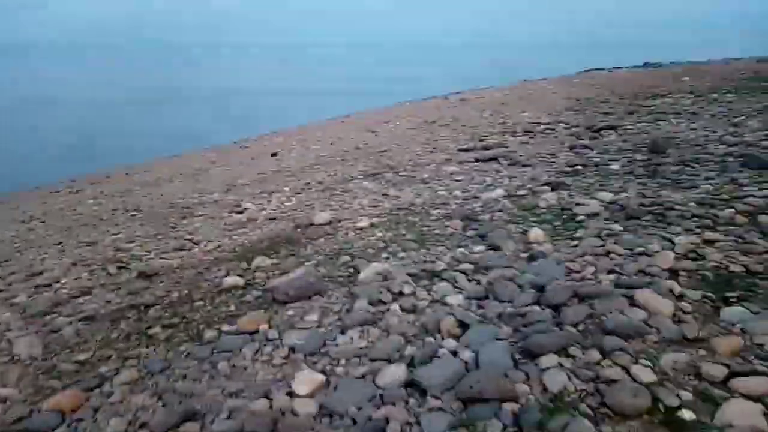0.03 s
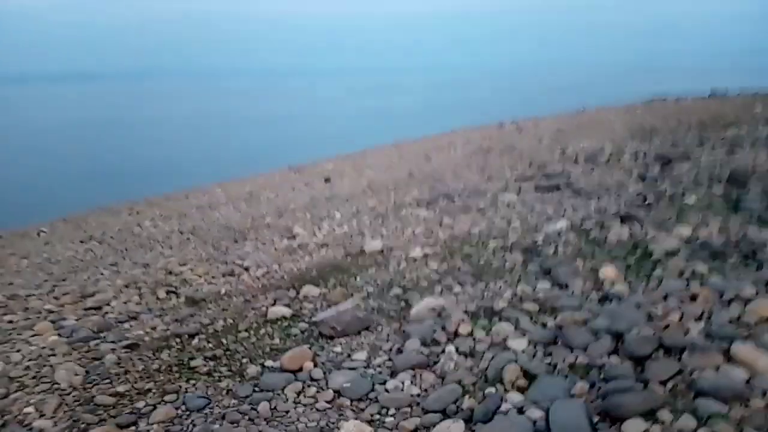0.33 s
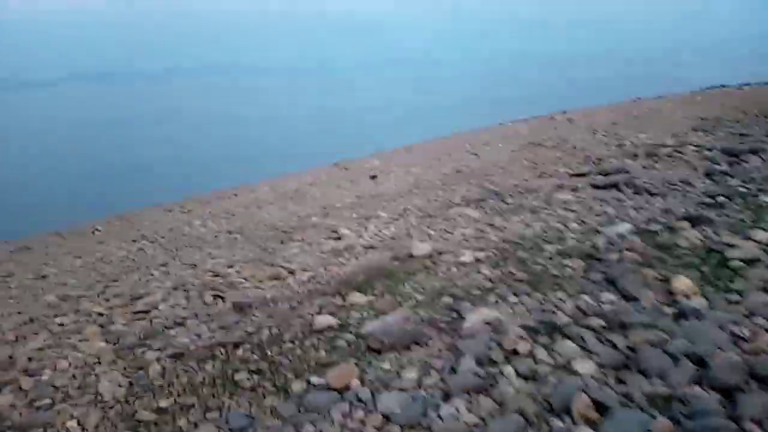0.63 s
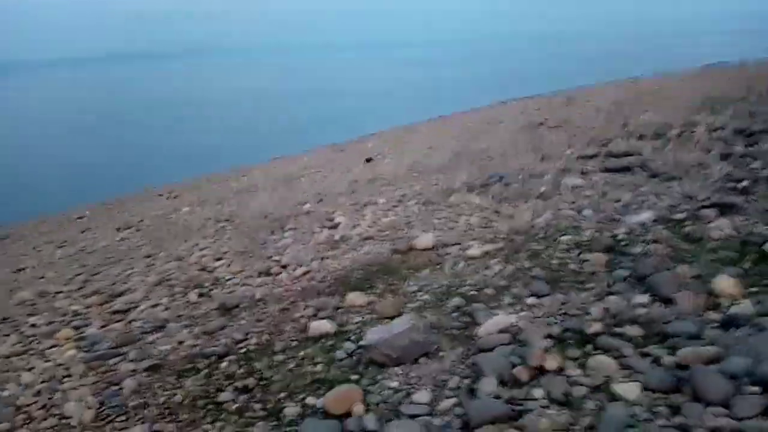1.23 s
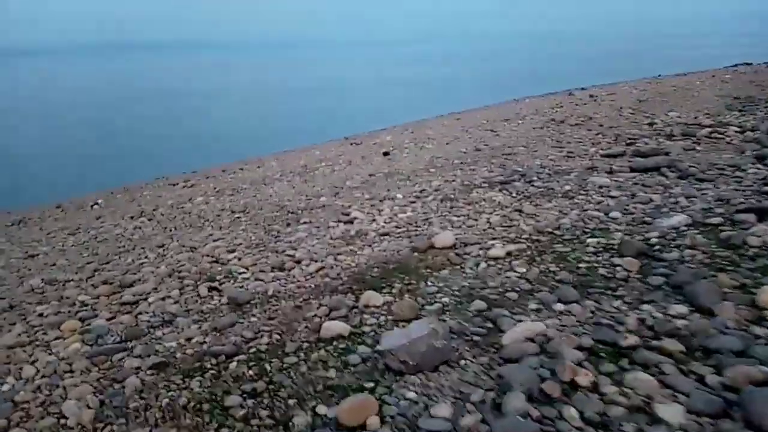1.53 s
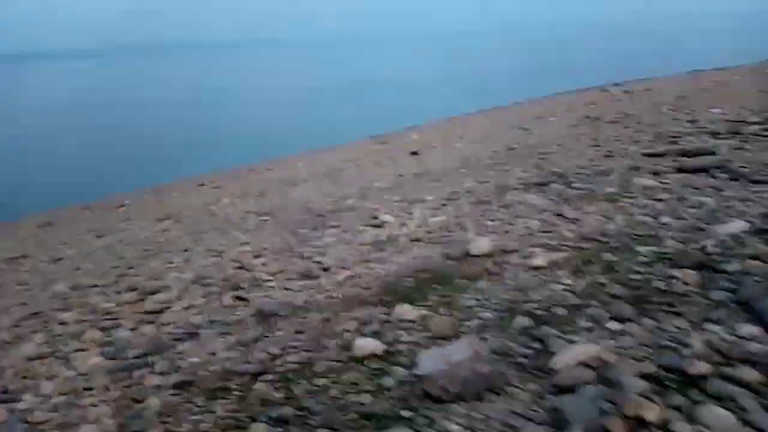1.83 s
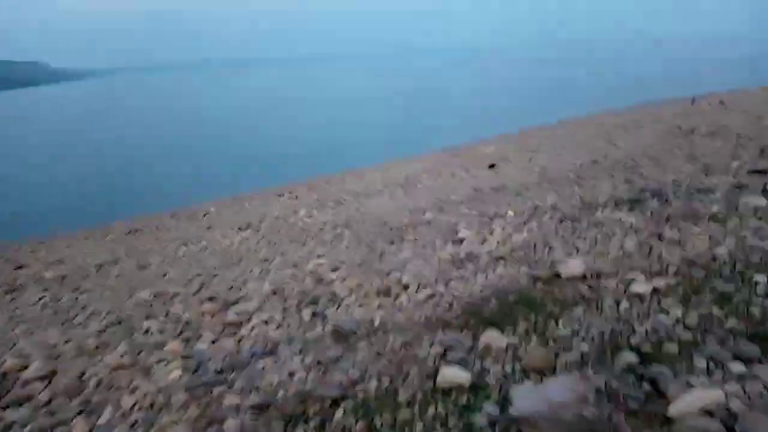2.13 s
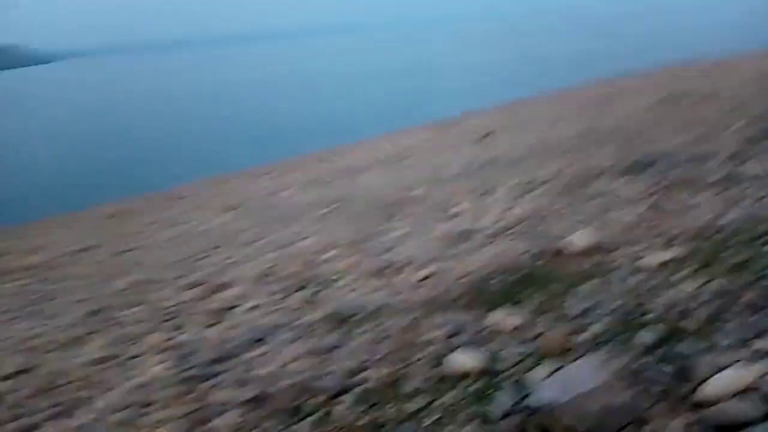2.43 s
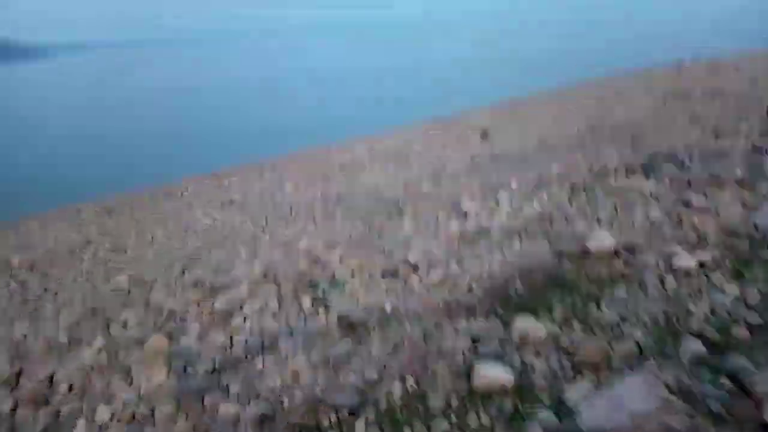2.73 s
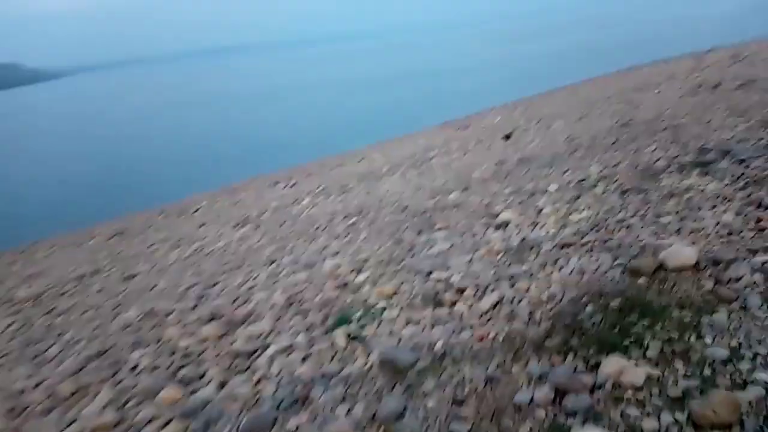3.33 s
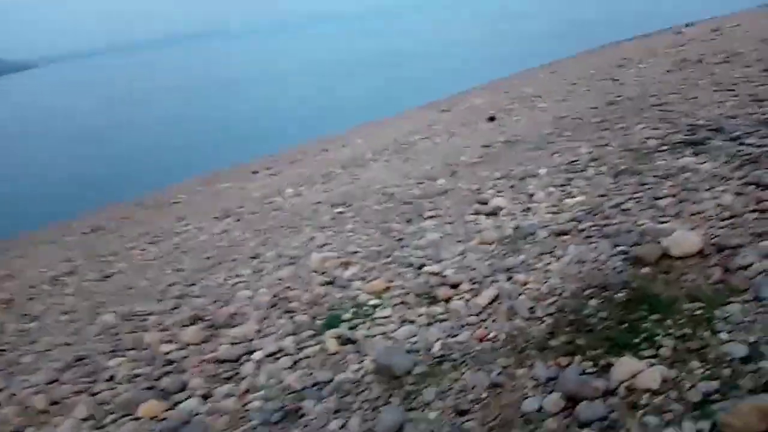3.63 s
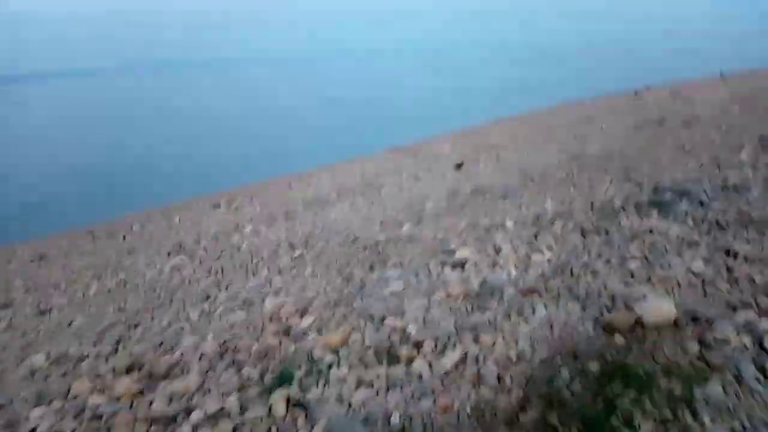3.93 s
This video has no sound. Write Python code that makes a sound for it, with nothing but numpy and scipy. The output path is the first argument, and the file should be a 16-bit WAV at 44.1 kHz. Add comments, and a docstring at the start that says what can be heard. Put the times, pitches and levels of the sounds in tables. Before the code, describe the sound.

Shoes crunching over a pebble lake shore, light wind and a small bird faintly behind.

```python
"""A pebble beach by a lake, the microphone near slow footsteps, water lapping faintly behind.
From the start, each push of a shoe sets off a crunch of small stones and grit; larger pebbles clack
together and now and then a heel thumps the bed. At about 0.9 s and again at 2.4 s a small bird
calls, three faint chirps each time. Light wind rumbles on the microphone throughout and,
in the last gust from 3.5 s, briefly hoots at its edge."""
import sys
import numpy as np
from scipy import signal
from scipy.fft import rfft, irfft, next_fast_len
from scipy.io import wavfile
from scipy.ndimage import uniform_filter1d, map_coordinates

SR = 44100
rng = np.random.default_rng(int(sys.argv[2]) if len(sys.argv) > 2 else 0)


def store_wav(level_fs):
    """Save 16-bit WAV to argv[1]."""
    pcm = np.round(np.clip(np.atleast_2d(level_fs), -1, 1) * 32767)
    wavfile.write(sys.argv[1], SR, pcm.T.astype(np.int16))


N = 176400

# Water at the shoreline: time_s, level_db
WATER_LEVEL = [(0, -64.5), (.5, -62.5), (.8, -66), (1.2, -64), (1.9, -63), (2.55, -59.5), (3.15, -65),
               (3.52, -63), (3.63, -76.5), (3.8, -62.5), (4, -54)]
# Colour of the water: frequency_hz, gain_db
WATER_COLOUR = [(100, 6.5), (300, -21.5), (700, -9.5), (1300, -7.5), (2000, -4), (3000, -19.5),
                (4300, -4.5), (5500, -16.5), (7000, -22), (8500, -30.5), (13000, -31), (15500, -24)]
# Gusts on the microphone: time_s, relative_level_db
GUSTS = [(0, -64.5), (.05, -57), (.33, -62.5), (.48, -67.5), (.7, -63.5), (.85, -65.5), (1.35, -67.5),
         (1.58, -54), (2.1, -70), (2.17, -52), (2.22, -60), (2.62, -59), (2.77, -51), (2.92, -57),
         (3.03, -54.5), (3.07, -39), (3.12, -51), (3.42, -48.5), (3.5, -55), (3.7, -47.5), (3.83, -47.5),
         (4, -44.5)]
# Colour of their rumble: frequency_hz, gain_db
RUMBLE_COLOUR = [(20, -18), (35, -31), (58, -0.5), (90, 0.5), (130, -3), (200, -11), (300, -23), (500, -42),
                 (1500, -63.5)]
# Eddy tone at the microphone's edge: time_s, pitch_hz, level_db
EDDY_TONE = [(3.51, 135, -62), (3.549, 137.8, -37.5), (3.6, 124.1, -41.5), (3.637, 120.6, -34),
             (3.68, 129.8, -42), (3.71, 133.6, -35.5), (3.749, 147, -41), (3.785, 147.8, -62),
             (3.814, 151, -39), (3.85, 153, -58)]
# The bird's chirps: start_s, level_db, upper_pitch_hz, lower_pitch_hz
BIRD_CHIRPS = [(0.901, -53.5, 7300, 6570), (.98, -55.5, 6900, 6240), (1.068, -55, 7200, 6180),
               (2.426, -50, 7300, 6400), (2.505, -49.5, 6880, 6140), (2.59, -48.5, 6940, 6100)]
# Heels striking the bed: start_s, relative_level_db, pitch_hz
HEEL_THUMPS = [(0.053, -35, 297), (.267, -30.5, 223), (2.249, -46, 330), (2.337, -42, 238),
               (3.3296, -27.5, 298)]
# Larger pebbles knocking together: start_s, relative_level_db, pitch_hz, t60_s
PEBBLE_CLACKS = [(0.169, -46, 1770, 0.0054), (0.206, -36.5, 4500, 0.015), (.305, -28, 2400, .005),
                 (.322, -20.5, 3420, 0.0023), (0.3248, -25.5, 2500, 0.0056), (.584, -38.5, 624, 0.018),
                 (.586, -43.5, 3330, 0.008), (.715, -29, 505, 0.017), (.716, -49, 3130, 0.0029),
                 (.904, -32, 3030, .006), (.91, -33, 2920, .005), (.965, -36, 4430, 0.0045),
                 (.99, -39, 3300, .005), (1.134, -49, 4030, .01), (1.166, -43.5, 3200, 0.0093),
                 (1.39, -26, 6850, 0.0063), (1.477, -24.5, 4400, 0.0051), (1.488, -24, 6980, 0.009),
                 (1.51, -32, 1500, 0.011), (1.6152, -17, 3100, 0.0051), (1.6793, -12, 2380, 0.0072),
                 (1.6852, -15.5, 3250, .006), (1.696, -16.5, 4300, 0.0052), (1.7619, -23, 3870, 0.0017),
                 (1.8003, -35, 1800, 0.01), (1.972, -42, 3600, 0.016), (2.114, -39, 566, 0.034),
                 (2.1153, -23, 4540, 0.005), (2.121, -30, 2320, 0.0055), (2.1958, -29, 2100, 0.0045),
                 (2.198, -46, 630, 0.033), (2.214, -27.5, 610, 0.048), (2.217, -21, 1930, 0.0082),
                 (2.2323, -17.5, 3650, 0.018), (2.25, -28.5, 566, 0.035), (2.2511, -21.5, 2050, .006),
                 (2.2865, -19, 4000, .005), (2.316, -21, 3560, .007), (2.336, -26, 3260, 0.0044),
                 (2.394, -37, 4000, .005), (2.4132, -26.5, 4250, 0.0027), (2.431, -38, 4080, .009),
                 (2.476, -36, 3960, .007), (2.545, -38, 2600, 0.0071), (2.836, -21.5, 1500, 0.0058),
                 (2.8495, -15.5, 2490, 0.0056), (2.8517, -14, 1760, 0.0027), (2.873, -24.5, 3500, 0.0059),
                 (2.898, -25.5, 1210, 0.0035), (2.907, -29, 2420, 0.0052), (2.9369, -27, 2140, .008),
                 (2.959, -36, 2400, .006), (3.08, -44, 2500, .006), (3.143, -37, 3320, 0.0071),
                 (3.232, -39, 4340, 0.006), (3.2993, -23, 3360, 0.0034), (3.33, -12.5, 2280, 0.0024),
                 (3.4467, -24.5, 2950, 0.0035), (3.555, -50, 4170, 0.017), (3.7434, -44.5, 5050, 0.025),
                 (3.781, -51, 4300, 0.022), (3.8022, -43, 3980, 0.018), (3.845, -46, 4460, .02),
                 (3.91, -29, 1767, 0.012), (3.989, -30.5, 2250, 0.0054)]
# Pushes of the shoes: peak_s, rise_s, fall_s, stones_db, bed_re_stones_db, grit_re_stones_db
SHOE_PUSHES = [(0.057, 0.011, 0.11, -52.5, -3.5, -17.5), (.157, 0.0059, .03, -46, -22, -16.5),
               (0.173, 0.033, 0.035, -44.5, -8.5, -18), (0.302, 0.012, 0.061, -46, 1.5, -14.5),
               (0.584, 0.0027, 0.021, -50.5, 3.5, -34), (0.683, 0.0068, .04, -52, -6, -11),
               (0.715, 0.044, 0.044, -46.5, 0, -9.5), (.792, 0.15, 0.037, -49, -9, -14.5),
               (0.853, 0.0038, 0.056, -46.5, -3, -6.5), (0.9, 0.052, 0.022, -41, -4.5, -28),
               (0.974, .06, 0.048, -47.5, -6.5, -22), (1.419, 0.079, 0.05, -47, -5.5, -13.5),
               (1.478, 0.0071, 0.027, -36.5, -19, -9), (1.514, 0.037, 0.043, -41, -4.5, -9),
               (1.452, 0.028, 0.037, -43, -8, -13), (1.583, 0.047, 0.1, -46, -0.5, -11),
               (1.641, .004, 0.016, -41.5, -13, -13.5), (1.687, 0.041, 0.058, -32, -3, -20.5),
               (1.85, 0.019, 0.025, -49, -24, -15), (1.972, 0.027, 0.21, -57, -7.5, -16.5),
               (2.061, 0.012, 0.15, -54.5, 0.5, -5), (2.12, 0.021, 0.049, -41, -2.5, -16),
               (2.241, 0.061, 0.1, -35.5, -5, -16.5), (2.281, 0.021, 0.025, -33, -10, -12.5),
               (2.349, 0.13, 0.3, -50, -6.5, -11), (2.656, 0.0096, 0.19, -45.5, -0.5, -8.5),
               (2.789, .1, 0.051, -44.5, -5.5, -15.5), (2.844, 0.036, .04, -32, -3, -21),
               (2.876, 0.013, 0.076, -35, -5.5, -20), (2.94, 0.033, 0.34, -57.5, -8.5, -24),
               (3.302, 0.016, 0.061, -42, -1.5, -17), (3.334, 0.017, 0.031, -38.5, -10, -17),
               (3.409, 0.12, 0.12, -44.5, -5, -15.5), (3.891, 0.021, 0.13, -42.5, -7, -13.5),
               (3.963, 0.084, 0.34, -40, -6, -18)]
# Colours of the small stones, the hollow bed and the grit: frequency_hz, gain_db
STONE_COLOUR = [(150, -34), (500, -7), (1000, -6), (2200, 2), (3000, -2), (4300, 3.5), (5200, -0.5),
                (5900, -5), (7000, -20.5), (8300, -12), (12000, -43)]
BED_COLOUR = [(60, -26), (160, -3), (280, -2), (420, 1), (600, 0), (850, -5), (1400, -26.5), (4000, -79)]
GRIT_COLOUR = [(2500, -15), (5000, -19), (7000, 17), (8400, -1), (10000, 8.5), (11500, 1.5), (13500, -7.5),
               (15200, 9), (16000, -18)]


def amp(db):
    return 10 ** (np.asarray(db) / 20)


def unit_rms(x):
    return x / np.sqrt(np.mean(x ** 2) + 1e-20)


def add(track, start_s, sound):
    i = max(round(start_s * SR), 0)
    track[i:i + len(sound)] += sound[:len(track) - i]


def curves(rows):
    """One value per sample for each column after the time."""
    times, *columns = np.transpose(rows)
    return [np.interp(np.arange(N) / SR, times, column) for column in columns]


def wobble(per_s):
    """A smooth random curve with per_s knots a second."""
    knots = rng.standard_normal(int(N * per_s / SR) + 4)
    return map_coordinates(knots, [np.arange(N) * per_s / SR])


def coloured(x, colour):
    """x through a causal filter of the given colour, at rms 1."""
    size = 2 * next_fast_len(N // 2 + 4096)
    hz, db = np.transpose(colour)
    gain_db = np.interp(np.log(np.fft.rfftfreq(size, 1 / SR) + 1), np.log(hz), db)
    cepstrum = irfft(np.log(amp(gain_db)))
    cepstrum[1:size // 2] *= 2  # fold to minimum phase
    cepstrum[size // 2 + 1:] = 0
    return unit_rms(irfft(rfft(x, size) * np.exp(rfft(cepstrum)))[:N])


def noise(colour):
    return coloured(rng.standard_normal(N), colour)


def patchy(x, depth_db=3.2, width_hz=330, life_s=.014):
    """x with short random resonances that come and go, at rms 1."""
    spectrum = signal.stft(x, nperseg=512)[2]
    bins, frames = np.indices(spectrum.shape)
    grid = [bins * SR / 512 / width_hz, frames * 256 / SR / life_s]
    knots = rng.standard_normal([int(axis.max()) + 2 for axis in grid])
    gain = amp(depth_db * map_coordinates(knots, grid))
    return unit_rms(signal.istft(spectrum * gain, nperseg=512)[1][:N])


def steadied(x, window_s=.018):
    """x with its slow level evened out."""
    power = np.abs(uniform_filter1d(x ** 2, round(window_s * SR)))
    return x / np.sqrt(power + 1e-9)


def lapping_water():
    """Faint water laps at the stones in the background."""
    level_db, = curves(WATER_LEVEL)
    return amp(level_db + 0.92 * wobble(25)) * patchy(noise(WATER_COLOUR))


def wind_rumble(boost_db=3, buffet_db=3):
    """Gusts buffet the microphone with low noise."""
    level_db, = curves(GUSTS)
    return amp(level_db + boost_db + buffet_db * wobble(14)) * noise(RUMBLE_COLOUR)


def wind_hoot(waver=.02, flutter_db=1.3, octave_db=-22, fade_s=.01):
    """Eddies at the microphone's edge sound a wavering tone in the last gust."""
    hz, db = curves(EDDY_TONE)
    t = np.arange(N) / SR
    phase = 2 * np.pi * np.cumsum(hz * (1 + waver * wobble(90))) / SR
    tone = np.sqrt(2) * (np.sin(phase) + amp(octave_db) * np.sin(2 * phase))
    gate = np.clip(np.minimum(t - EDDY_TONE[0][0], EDDY_TONE[-1][0] - t) / fade_s, 0, 1)
    return gate * amp(db + flutter_db * wobble(100)) * tone


def bird(chirp_s=.042, roughness=.022, rasp_db=2, echo_db=-8, echo_t60_s=0.43):
    """Each chirp is two arched whistles at once, with a short outdoor echo."""
    out, u = np.zeros(N), np.linspace(-1, 1, round(chirp_s * SR))
    for start_s, db, upper_hz, lower_hz in BIRD_CHIRPS:
        for hz, arch, voice_db, swell in ((upper_hz, .14, -6, .5), (lower_hz, .11, 0, 2)):
            pitch_hz = hz * (1 - arch * u ** 2 + roughness * wobble(308)[:len(u)])
            envelope = amp(db + voice_db + rasp_db * wobble(514)[:len(u)]) * (1 - u ** 2) ** swell
            add(out, start_s, envelope * np.sin(2 * np.pi * np.cumsum(pitch_hz) / SR))
    t = np.arange(SR // 3) / SR
    echo = rng.standard_normal(len(t)) * amp(-60 * t / echo_t60_s)
    return out + amp(echo_db) * signal.fftconvolve(out, echo / np.linalg.norm(echo))[:N]


def heel_thumps(t60_s=0.016):
    """A heel pushes the bed once, dully."""
    out, t = np.zeros(N), np.arange(SR // 10) / SR
    for start_s, db, hz in HEEL_THUMPS:
        envelope = 2 * amp(db - 60 * t / t60_s) * (1 - np.exp(-2 * hz * t))
        add(out, start_s, envelope * np.sin(2 * np.pi * hz * t))
    return out


def pebble_ring(t, hz, t60_s, rise_cycles=1.15):
    """One struck pebble rings; the softness of the contact rounds its attack."""
    rise = np.sin(np.pi / 2 * np.minimum(hz * t / rise_cycles, 1)) ** 2
    envelope = rise * amp(-60 * t / t60_s)
    return envelope / envelope.max() * np.sin(2 * np.pi * hz * t)


def pebble_clacks(trim_db=-2.5, second_db=-7, rattle_db=-12, rattle_rise_s=.001, rattle_t60_s=0.011):
    """Two pebbles meet and ring for some milliseconds, then their neighbours rattle."""
    out, t = np.zeros(N), np.arange(SR // 10) / SR
    neighbours = noise(STONE_COLOUR) + noise(BED_COLOUR) / 2
    rattle_envelope = amp(rattle_db - 60 * t / rattle_t60_s) * np.minimum(t / rattle_rise_s, 1)
    pitch_ratios = rng.uniform(0.48, 1.316, len(PEBBLE_CLACKS))
    for (start_s, db, hz, t60_s), ratio in zip(PEBBLE_CLACKS, pitch_ratios):
        pair = pebble_ring(t, hz, t60_s) + amp(second_db) * pebble_ring(t, hz * ratio, t60_s / 2)
        rattle = np.roll(neighbours, -round(start_s * SR))[:len(t)] * rattle_envelope
        add(out, start_s, amp(db + trim_db) * (pair + rattle))
    return out


def stone_contacts(per_s, size_spread_db, max_count, median_hz=2840, t60_cycles=8.8, tick_db=6):
    """Small stones touch at random, each with a tick and a few cycles of ringing."""
    when, size, chance, sign = rng.random((max_count, 4)).T
    hz = np.clip(median_hz * np.exp(0.586 * rng.standard_normal(max_count)), 300, 14000)
    gain = amp(-size_spread_db * np.log(size + .01)) * np.sign(sign - .5)
    sounding = chance < per_s * N / SR / max_count
    hz, gain = hz[sounding, None], gain[sounding, None]
    age = np.arange(SR // 200)
    cycles = hz * age / SR
    rings = np.sqrt(hz / median_hz) * np.sin(2 * np.pi * cycles) * amp(-60 * cycles / t60_cycles)
    rings[:, 0] += amp(tick_db)
    samples = (when[sounding, None] * N).astype(int) + age
    return unit_rms(np.bincount(samples.ravel(), (gain * rings).ravel(), N)[:N])


def settling_stones(push_level, level_db=-17, fade_s=0.1):
    """Disturbed stones go on settling after each push."""
    decay = np.exp(-1 / (fade_s * SR))
    unrest = signal.lfilter([1 - decay], [1, -decay], push_level)
    contacts = stone_contacts(per_s=230, size_spread_db=5, max_count=1500)
    return amp(level_db) * unrest * coloured(contacts, STONE_COLOUR)


def shoe_crunch(edge_db=20, jerk_db=2.5, jerks_per_s=130, sand_db=-7, grit_sand_db=-3.5):
    """Each push swells and dies; the same contacts sound in the stones, the hollow bed and the grit."""
    t = np.arange(N) / SR
    power = np.zeros((3, N))
    for peak_s, rise_s, fall_s, db, bed_db, grit_db in SHOE_PUSHES:
        push = amp(db - edge_db * np.maximum((peak_s - t) / rise_s, (t - peak_s) / fall_s))
        power += (amp([[0], [bed_db], [grit_db]]) * push) ** 2
    stone_level, bed_level, grit_level = np.sqrt(power)
    jerks = amp(jerk_db * wobble(jerks_per_s))  # the stones give way in small jerks
    grains = stone_contacts(per_s=3400, size_spread_db=4, max_count=20000)
    sliding_sand = amp(sand_db) * rng.standard_normal(N)
    shifting = patchy(grains + sliding_sand)  # every stone rings at its own pitches
    contacts = steadied(jerks * shifting)  # the foot's weight, not chance, sets the level
    grit_sand = amp(grit_sand_db) * jerks * noise(GRIT_COLOUR)
    stones = stone_level * coloured(contacts, STONE_COLOUR)
    bed = bed_level * coloured(contacts, BED_COLOUR)
    grit = grit_level * (coloured(contacts, GRIT_COLOUR) + grit_sand)
    return stones + bed + grit + settling_stones(stone_level)


def scene():
    """Footsteps, lake, wind and bird at one mono microphone."""
    footsteps = shoe_crunch() + pebble_clacks() + heel_thumps()
    return (footsteps + lapping_water() + wind_rumble() + wind_hoot() + bird())[None]


def record(dry):
    """The recorder keeps nothing above its band limit."""
    top_hz = 15850
    size = next_fast_len(N + SR // 2)
    passband = np.fft.rfftfreq(size, 1 / SR) < top_hz
    return irfft(rfft(dry, size) * passband, size)[..., :N]


dry = scene()
out = record(dry)
store_wav(out)
```